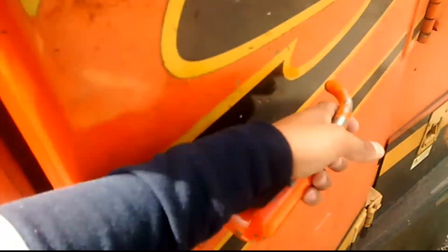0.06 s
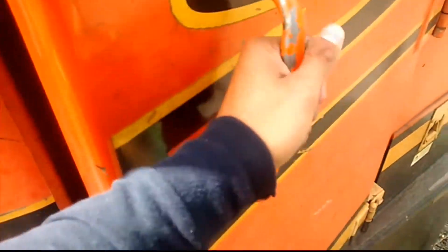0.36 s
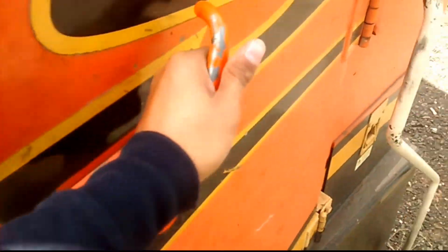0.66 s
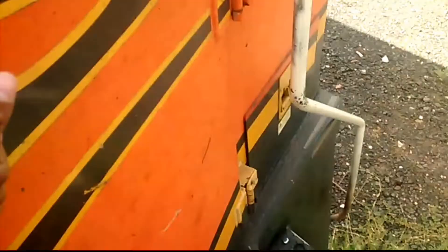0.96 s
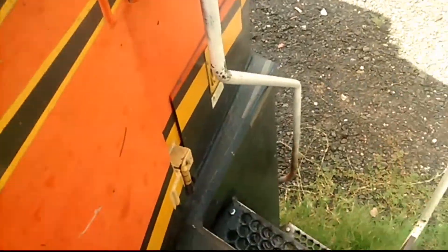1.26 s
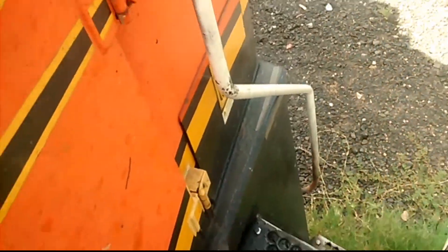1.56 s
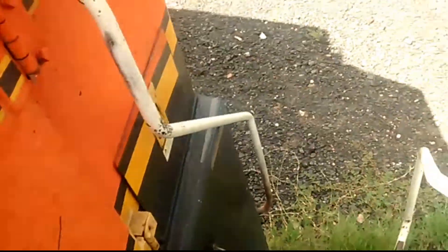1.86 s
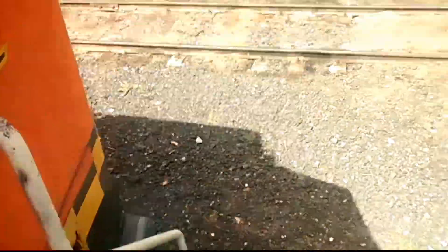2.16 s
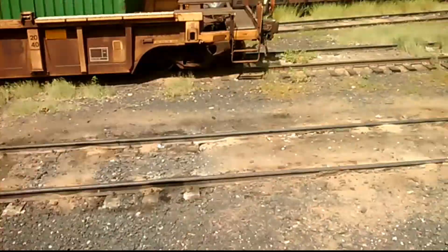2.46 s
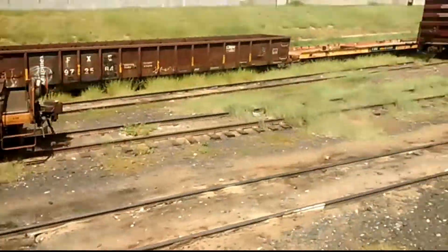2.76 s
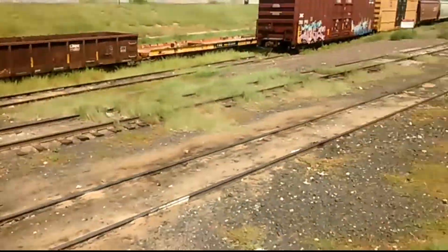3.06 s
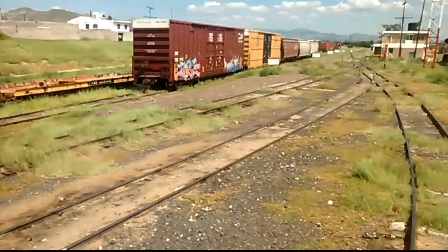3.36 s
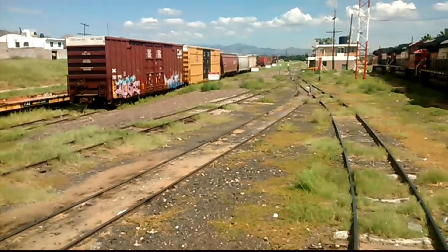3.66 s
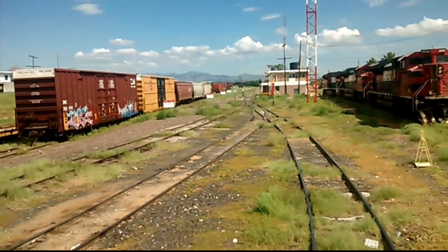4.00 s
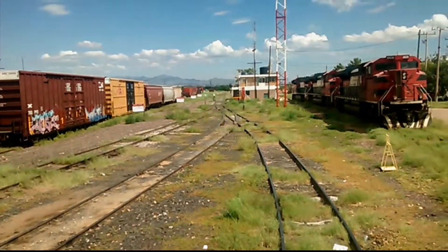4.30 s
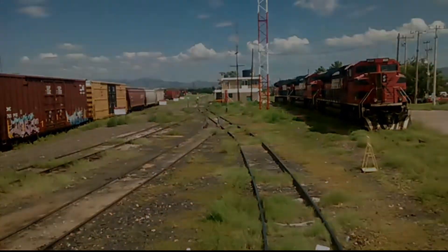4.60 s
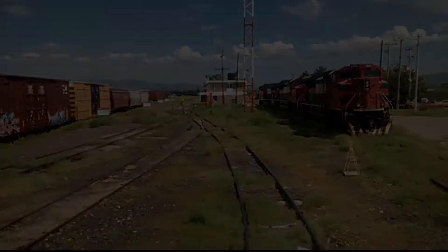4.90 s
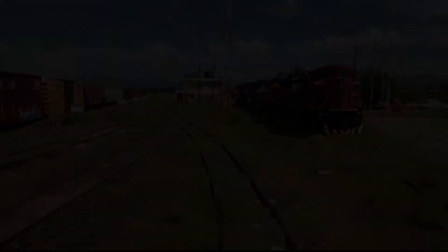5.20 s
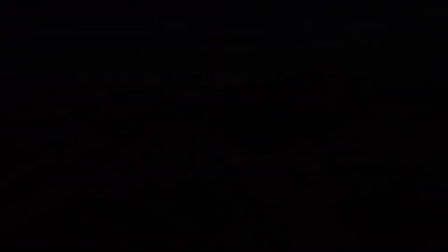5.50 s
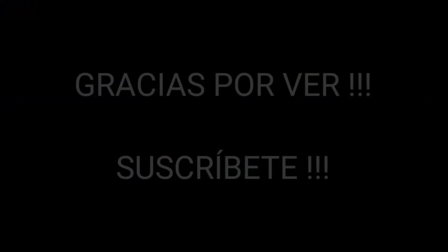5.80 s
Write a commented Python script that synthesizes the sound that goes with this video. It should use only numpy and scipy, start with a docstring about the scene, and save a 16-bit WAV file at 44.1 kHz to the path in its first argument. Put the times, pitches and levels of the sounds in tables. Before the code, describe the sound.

Close by, a hand works the steel fittings on a locomotive cab, making irregular knocks, sharp clicks and tiny squeaks over a rumbling panel. Something clacks free and scrapes briefly to a stop. After that, only low, gusty wind remains in the open rail yard, with faint rubs and soft bumps on the microphone, until it fades out.

```python
"""At a locomotive cab in an open rail yard, a hand works the steel fittings on the cab's side.
They knock and click when struck, squeak as the steel sticks and slips, and make the panel rumble;
then something clacks free and scrapes to a stop. Low, gusty wind is left, with hollow hums, light rubs,
a brushing sleeve, and buffets and soft bumps on the microphone. It fades out.
The left channel is inverted."""
import sys
import numpy as np
from scipy import signal
from scipy.fft import rfft, irfft, next_fast_len
from scipy.io import wavfile
from scipy.ndimage import uniform_filter1d

SR = 44100
rng = np.random.default_rng(int(sys.argv[2]) if len(sys.argv) > 2 else 0)


def store_pcm(level_fs):
    """Save levels as 16-bit WAV."""
    pcm = np.round(np.clip(level_fs, -1, 1) * 32767).astype(np.int16)
    wavfile.write(sys.argv[1], SR, np.atleast_2d(pcm).T)


N = 257720
TIME = np.arange(N) / SR

# A mode is a note that a part rings at; t60 is the time it takes to die away by 60 dB.
# A colour is a gain for each pitch. Levels are relative: colours and gains act on top of them.
# blows on the steel: t/s, level/dB, treble/dB, crack/dB, panel ring/dB,
# then the struck spot's f/Hz, level/dB, t60/s, then the clank's f/Hz, level/dB
KNOCKS = [(.135, 15, -7, -13, -14, 1840, -39, 0.026, 2900, -33),
          (.151, 6, -10, 15, -15, 1150, -25.5, .05, 3280, -44),
          (.321, 22, -4.5, -27, -1, 945, -23, 0.069, 3600, -26.5),
          (.410, 28, -4.5, -9.5, -1, 1196, -16.5, 0.1, 3160, -22),
          (.426, 26.5, -19, -9.5, -1.5, 631, -12, 0.1, 1300, -40),
          (.476, 22.5, -4, -3, -4, 500, -32, 0.044, 1750, -32),
          (.784, 19, -7, -7.5, -10, 985, -27, 0.079, 1530, -38),
          (.857, 28.5, -6, -5, -1, 790, -10.5, 0.052, 1940, -21),
          (.884, 26.5, 0, -12, -7.5, 1780, -15.5, 0.013, 3780, -22),
          (1.096, 25, -4.5, -4, -1.5, 1570, -22.5, 0.036, 1390, -39),
          (1.123, 27, -8.5, -1.5, -11, 710, -25, .03, 3560, -23),
          (1.257, 29, -2.5, -6.5, 1, 686, -3.5, 0.055, 1716, -16),
          (1.6286, 34.5, 3.5, 2, -10, 420, -6, .035, 1150, -11),
          (1.705, 21.5, -4, -8.5, -2, 910, -15, 0.02, 1550, -27),
          (1.796, 28.5, -1.5, -7.5, -17.5, 730, -22.5, 0.016, 1650, -29),
          (1.813, 26.5, -14, -14.5, -12, 1250, -19, 0.017, 1590, -16.5)]
# colour of a blow: f/Hz, level/dB
KNOCK_COLOUR = [(80, 1), (200, 5), (450, 1), (700, -5.5), (1200, -13), (1900, -19), (2650, -22),
                (3500, -24), (4300, -28), (5200, -28.5), (6500, -32.5), (9000, -40), (12000, -51),
                (15000, -67.5)]
# modes of a clanking fitting: multiple of its pitch, level/dB
CLANK_MODES = [(0.861, -2), (0.949, -2.5), (1.05, -3), (1.17, -7)]
# modes of the cab panel: f/Hz, level/dB, t60/s
PANEL_MODES = [(521.7, 1.5, 0.19), (648, 4.5, 0.095), (759.5, -1.5, 0.12), (853, -4.5, 0.097),
               (975, -9.5, 0.2), (1075, -11.5, 0.18), (1204, -19, 0.19), (1724, -8, 0.05),
               (1860, -17.5, 0.042), (2212, -15.5, 0.091), (2914, -17.5, 0.15), (3300, -18, 0.1),
               (3830, -20, 0.093)]
# clicks of small steel parts: t/s, level/dB, ring/dB, centre of the ring f/Hz
CLICKS = [(0.989, 4.5, -5, 13000), (1.044, -9.5, -14, 7000), (1.2115, 3, -4, 9800), (1.335, -19, -20, 6000),
          (1.656, -16.5, -16, 4000), (1.704, -7.5, -14, 8500), (1.749, -15, -12, 7400),
          (1.764, -8.5, -7, 7400), (1.813, -11, -12, 6500), (1.832, 0.5, -10, 6440),
          (1.855, -19, -12, 6700), (1.948, -11.5, -3, 4000), (2.031, -21, -3, 4300),
          (2.087, -28, -10, 3600)]
# colour of a click: f/Hz, level/dB
CLICK_COLOUR = [(300, -17), (900, -1), (1600, 3), (2400, -3), (3400, 1), (5000, -4), (7000, -4.5),
                (10000, -9.5), (13000, -31), (15500, -32)]
# modes of the small steel parts: f/Hz, level/dB, t60/s
SMALL_PART_MODES = [(3138, -3, 0.18), (3900, 1, 0.05), (4500, -5, 0.57), (6650, -2, 0.24),
                    (7600, -1.5, 0.045), (8860, -10, 0.22), (9950, -9.5, .36), (10165, 2.5, 0.26),
                    (11210, -9, 0.17), (10950, -18, 0.25), (13080, -6, 0.22)]
# pulls on the fitting: start t/s, length/s, level/dB
PULLS = [(0, 1.68, -17), (.39, 0.078, 1.5), (.61, 0.11, -5), (.76, 0.18, -4)]
# low resonances of the panel: f/Hz, rough width/Hz, level/dB
RUMBLE_MODES = [(232, 15.3, 4.5), (320, 48, -17), (420, 99, -5), (465, 130, -5), (592, 18, -12.5)]
# scrapes after the clack: start t/s, length/s, level/dB
SCRAPES = [(1.64, 0.045, 1), (1.71, 0.042, -12), (1.757, 0.065, -4.5)]
# colour of scraping steel: f/Hz, level/dB
SCRAPE_COLOUR = [(100, -11.5), (300, -16), (680, -7.5), (1100, -17.5), (1550, -14.5), (2000, -19.5),
                 (2600, -28.5), (3600, -34), (4080, -23), (4500, -33.5), (5200, -44.5), (6500, -38.5),
                 (7000, -44), (7450, -31.5), (8100, -52), (8750, -39), (10000, -50.5), (11500, -52.5),
                 (15500, -69.5)]
# squeals of steel: start t/s, length/s, first f/Hz, last f/Hz, level/dB, jitter as a share of the pitch
SQUEALS = [(0.141, 0.012, 1146, 1140, -35.5, 0.13), (.269, 0.036, 5620, 5670, -42, 0.02),
           (0.3053, 0.0052, 7480, 7330, -36.5, 0.03), (.306, 0.0058, 6870, 6450, -41, .05),
           (.308, 0.0027, 5400, 5450, -33.5, .03), (.781, 0.01, 1075, 935, -23.5, 0.03),
           (.782, 0.019, 1550, 1525, -43, 0), (1.662, 0.036, 1632, 1410, -34, 0.04),
           (1.757, 0.0089, 1660, 1580, -27.5, 0), (1.776, 0.012, 1573, 1590, -25.5, 0.08),
           (1.811, 0.01, 1530, 1460, -28.5, 0.03), (3.762, .012, 9780, 9760, -58.5, 0.05)]
# resonances of the handle: f/Hz, width/Hz, level/dB
HANDLE_MODES = [(5712, 10, 3), (7500, 32, 1), (11700, 22, -4), (13450, 25, 10)]
# hissing rubs and hollow hums in the yard noise: middle t/s, half length/s, f/Hz, width/Hz, level/dB
RUBS_AND_HUMS = [(0.155, 0.01, 3180, 1100, -28), (2.215, 0.016, 1830, 200, -38),
                 (2.266, 0.13, 449, 90, -14), (2.505, 0.13, 6660, 450, -49), (2.48, 0.13, 5930, 220, -49),
                 (3.074, 0.044, 520, 120, -7.5), (3.18, .045, 4460, 600, -39),
                 (3.204, 0.04, 1320, 160, -17.5), (3.692, 0.052, 487, 70, -8),
                 (3.822, .012, 11100, 600, -48), (5.21, 0.045, 3900, 700, -55)]
# soft bumps on the microphone: t/s, thud level/dB, thud f/Hz, scuff level/dB, scuff t60/s
BUMPS = [(2.205, -34, 450, 8, 0.085), (3.268, -5.5, 270, 9, 0.027), (3.326, -27, 700, 29.5, 0.13),
         (3.512, -15, 300, 17, 0.035), (3.545, -11, 320, 7, .03), (3.751, -22, 1080, 33, 0.094),
         (3.754, -5, 435, 24.5, 0.11), (3.957, -12.5, 1340, 29, 0.085), (4.013, -6.5, 238.8, 12, .03),
         (4.056, -11, 333, 10, .02), (4.062, -9.5, 356, 14, 0.019), (4.102, -10, 276, 22.5, 0.021),
         (4.13, -10, 333, 13, 0.022), (4.163, -10.5, 273, 20.5, 0.029), (4.182, -8, 392, 17, 0.027),
         (4.2, -13.5, 714, 22, 0.03), (4.202, -14, 340, 23, 0.015), (4.377, -12, 278, 13, .03),
         (4.782, -19, 290, 9, .03), (4.946, -19, 280, 1, .03), (5.031, -8, 435, 15.5, .025),
         (5.111, -16, 550, 12, 0.091), (5.25, -18, 302, 17, 0.1), (5.54, -12.5, 400, 23, .06),
         (5.59, -23, 402, 18.5, .05)]
# colour of a bump's scuff: f/Hz, level/dB
SCUFF_COLOUR = [(60, 2), (150, -3), (300, -6), (600, -8), (1200, -20.5), (2100, -29), (4000, -37.5),
                (5500, -53), (8000, -63), (15000, -84)]
# open air of the yard: t/s, level/dB, bass/dB, treble/dB
WIND = [(0, -6, 4.5, 3.5), (.22, -7.5, 9, 6), (.38, -4.5, 4, 4.5), (1.02, -1, -1.5, 5),
        (1.42, -9, 0.5, 4.5), (1.58, -3.5, 1, 3.5), (1.9, -12.5, -1, 5.5), (2.13, -16, 1, 6.5),
        (2.24, -10.5, -0.5, 4.5), (2.65, -4.5, -4, -0.5), (3.34, 2.5, -5, 3), (3.48, -2, 0, 1),
        (3.74, 1, -3.5, 0.5), (4.06, 1, -2.5, -2), (4.23, -7, 2.5, -3), (4.72, -3.5, -2, -6),
        (5.02, -10, 5, 4.5), (5.6, -4, -3.5, 3), (5.68, -5, -3, 7)]
# colour of the wind: f/Hz, level/dB
WIND_COLOUR = [(15, 5.5), (29, -13.5), (62, -13), (110, -0.5), (230, -1), (480, -9.5), (800, -21),
               (1350, -28.5), (2300, -41.5), (3100, -45.5), (4200, -49.5), (5500, -57), (9500, -62.5),
               (12500, -72.5), (15000, -80)]
# colour of the deep gusts: f/Hz, level/dB
GUST_COLOUR = [(10, -14), (28, 1), (45, -17), (70, -25), (200, -52), (600, -100)]
# buffets of wind on the microphone: middle t/s, half length/s, level/dB
BUFFETS = [(.17, 0.39, -6.5), (1.13, 0.065, 0), (3.29, 0.15, -5.5), (4.16, 0.059, -0.5), (4.79, 0.1, 0.5),
           (4.945, 0.027, 4), (5.26, 0.032, 4)]
# colour of a buffet: f/Hz, level/dB
BUFFET_COLOUR = [(30, -18), (62, -20.5), (110, -3.5), (200, 1), (400, -11.5), (800, -23.5), (2000, -60),
                 (6000, -89.5)]
# faint high hisses (sleeve brushes and the crisp edge of one bump): middle t/s, half length/s, level/dB
HISSES = [(.55, 0.011, -46.5), (1.525, 0.017, -52), (2.5, 0.22, -57), (3.17, 0.052, -47),
          (3.356, 0.071, -57.5), (3.966, 0.011, -48), (4.0, 0.17, -55), (4.41, .012, -56),
          (4.58, 0.3, -56.5)]
# colour of those hisses: f/Hz, level/dB
HISS_COLOUR = [(500, -34), (3000, -2.5), (6500, -2.5), (9500, -2), (12500, -8), (15000, -18)]
# how alike the noise is left and right: f/Hz, likeness from 0 to 1
STEREO_LIKENESS = [(100, 1), (1200, 1), (2300, 0.9), (4000, 0.84), (8000, 0.099), (15000, 0.23)]
# gain of the left channel: f/Hz, level/dB
LEFT_COLOUR = [(60, -2), (110, -3), (200, -3), (380, -3.5), (700, -6.5), (1290, -4.5), (2380, -5.5),
               (4400, -5.5), (8120, -4.5), (15000, -5)]


def knocks(ring_db=-46, hard_db=32.5, hard_t60=0.076, clank_cycles=50):
    """Each blow cracks, clatters, clanks and rings the steel; harder ones have a shorter clatter."""
    out = np.zeros((2, N))
    for s, db, treble_db, crack_db, panel_db, spot_hz, spot_db, spot_t60, clank_hz, clank_db in KNOCKS:
        softer_db = hard_db - db
        hit = blow(hard_t60 * amp(1.28 * softer_db), crack_db, swell=0.0052)
        bass_db = -4.5 - 0.07 * softer_db - 0.059 * panel_db  # more panel ring, slightly less bass
        add(out, s, amp(db) * coloured(hit, KNOCK_COLOUR, bass_db, treble_db))
        panel = focused(PANEL_MODES, spot_hz, octave_loss_db=1)
        add(out, s, amp(db + panel_db + ring_db) * ring(panel))
        add(out, s, ring([(spot_hz, spot_db, spot_t60)]))
        clank_t60 = clank_cycles / clank_hz
        clank = [(clank_hz * ratio, clank_db + mode_db, clank_t60) for ratio, mode_db in CLANK_MODES]
        add(out, s, ring(clank))
    return out


def clicks(ring_db=-42, gain_db=1):
    """Small steel parts click: a catch snapping, scrape ticks and lower ticks, each around its pitch."""
    out = np.zeros((2, N))
    for s, db, part_db, centre_hz in CLICKS:
        snap = blow(t60=0.04, crack_db=-4.5, swell=0.003)
        add(out, s, amp(db + gain_db) * coloured(snap, CLICK_COLOUR))
        modes = focused(SMALL_PART_MODES, centre_hz, octave_loss_db=18)
        add(out, s, amp(db + part_db + ring_db) * ring(modes))
    return out


def panel_rumble():
    """Friction from each pull shakes the low resonances of the panel."""
    friction = noise(N) * strokes(PULLS, attack_s=0.028, release_db_per_s=177.5)
    return filtered(friction, lambda f: sum(
        amp(db) / (1 + ((f - hz) / (0.82 * width)) ** 2) for hz, width, db in RUMBLE_MODES))


def scrape(slips_per_s=420, slip_db=13.5, hiss_db=-4, chatter_db=1):
    """Tiny slips of steel on steel tick over a hiss, and a slower chatter shakes their level."""
    slips = (rng.random(N) < slips_per_s / SR) * rng.uniform(-1.5, 1.5, N)
    friction = amp(slip_db) * slips + amp(hiss_db) * noise(N)
    friction *= amp(chatter_db * wander(N, rate_hz=52))
    friction *= strokes(SCRAPES, attack_s=0.0072, release_db_per_s=348)
    return coloured(friction, SCRAPE_COLOUR)


def squeals(flutter_db=3, attack_s=0.0028, release_db_per_s=1099.5):
    """Steel that sticks and slips regularly sings a note and its octave, and sets the handle ringing."""
    out = np.zeros((2, N))
    t = np.arange(SR // 8) / SR
    for s, length, first_hz, last_hz, db, jitter in SQUEALS:
        glide_hz = np.interp(t, [0, length], [first_hz, last_hz])
        pitch_hz = glide_hz * (1 + jitter * wander(len(t), rate_hz=2100))
        phase = 2 * np.pi * np.cumsum(pitch_hz) / SR
        octave_db = read([(3500, -21.5), (5700, -7.5), (6700, -14), (7500, -19)], first_hz)
        tone = np.sin(phase) + amp(octave_db) * np.sin(2 * phase)
        hold = np.minimum(t / attack_s, 1) * amp(-release_db_per_s * np.maximum(t - length, 0))
        add(out, s, np.sqrt(2) * tone * hold * amp(db + flutter_db * wander(len(t), rate_hz=160)))
    return filtered(out, lambda f: 1 + sum(
        amp(db) / (1 + 2j * (f - hz) / width) for hz, width, db in HANDLE_MODES))


def rubs_and_hums(grain_db=3):
    """Brief sounds, each in a narrow band: light hissing rubs and hollow hums in the yard noise."""
    grit = noise(N) * amp(grain_db * wander(N, rate_hz=160))
    out = np.zeros((2, N))
    for s, half, hz, width, db in RUBS_AND_HUMS:
        out += filtered(grit * swells([(s, half, db)]), lambda f: 1 / (1 + (2 * (f - hz) / width) ** 4))
    return out


def bumps(rise_cycles=0.54):
    """Each bump rocks the microphone's housing for a cycle or two and scuffs it briefly."""
    out = np.zeros((2, N))
    t = np.arange(SR // 20) / SR
    for s, db, hz, scuff_db, t60 in BUMPS:
        age = t * hz / rise_cycles  # the push is strongest at age 1
        push = (age * np.exp(1 - age)) ** 2
        add(out, s, amp(db) * push * np.sin(2 * np.pi * hz * t))
        scuff = blow(t60, crack_db=-11, swell=0.0039)
        add(out, s, amp(scuff_db) * coloured(scuff, SCUFF_COLOUR, treble_db=-3))
    return out


def wind(patch_db=2.2, buffet_db=1):
    """Moving air makes a low rush; patches of pitch swell and sink, and the bass shakes quickly."""
    hz, t, spectrum = signal.stft(noise(N), SR, nperseg=1024, noverlap=768)
    db, bass_db, treble_db = wind_levels(t)
    patches = uniform_filter1d(rng.standard_normal(spectrum.shape[1:]), size=9, axis=0)  # blur in pitch
    patches = uniform_filter1d(patches, size=10, axis=1)  # blur in time
    spectrum *= amp(db + tilt(hz[:, None], bass_db, treble_db) + patch_db * patches / patches.std())
    air = signal.istft(spectrum, SR, nperseg=1024, noverlap=768)[1][:, :N]
    bass = filtered(air, lambda f: 1 / (1 + (f / 1100) ** 4))
    air += bass * (amp(buffet_db * wander(N, rate_hz=51)) - 1)
    return filtered(air, lambda f: amp(read(WIND_COLOUR, f)))


def gusts(gain_db=4):
    """Slowly churning air presses on the microphone, most when the wind is loud and bright."""
    db, _, treble_db = wind_levels(TIME)
    pressure = noise(N) * amp(gain_db + 0.99 * db + 0.65 * treble_db)
    return filtered(pressure, lambda hz: amp(read(GUST_COLOUR, hz)))


def buffets(flutter_db=3):
    """Brief swirls of air flutter against the microphone."""
    swirls = noise(N) * swells(BUFFETS) * amp(flutter_db * wander(N, rate_hz=150))
    return filtered(swirls, lambda hz: amp(read(BUFFET_COLOUR, hz)))


def faint_hisses(grain_db=1.7):
    """High, grainy hisses swell and ebb: a sleeve's fibres catching, and the crisp edge of one bump."""
    hiss = noise(N) * swells(HISSES) * amp(grain_db * wander(N, rate_hz=160))
    return coloured(hiss, HISS_COLOUR)


def blow(t60, crack_db, swell, size=16384):
    """A crack and its noisy tail. A stronger crack makes the tail rise and lose its treble sooner."""
    t, tail, crack = np.arange(size) / SR, noise(size), amp(crack_db)
    low = filtered(tail, lambda hz: 1 / (1 + (hz / 1800) ** 4))
    rise = 1 - np.exp(-t * (1 + 10 * crack) / swell)
    slow = rise * 1000 ** (-t / t60)
    fast = rise * 1000 ** (-t * (1 + crack) / t60)
    out = (low * slow + (tail - low) * fast) / np.linalg.norm(slow)
    out[:, 0] += crack
    return out / np.sqrt(1 + crack ** 2)


def ring(modes, contact_s=0.00065):
    """Struck steel rings as dying sine waves that start up or down and build during the contact."""
    t = np.arange(SR // 2) / SR
    sines = sum(rng.choice([-1, 1]) * amp(db - 60 * t / t60) * np.sin(2 * np.pi * hz * t)
                for hz, db, t60 in modes)
    return sines * (1 - np.exp(-t / contact_s))


def focused(modes, centre_hz, octave_loss_db):
    """Weakens modes the further they lie from centre_hz."""
    return [(hz, db - octave_loss_db * np.log2(hz / centre_hz) ** 2, t60) for hz, db, t60 in modes]


def strokes(rows, attack_s, release_db_per_s):
    """Gain over time of rubbing strokes: each rises, holds and dies away."""
    return sum(np.clip((TIME - s) / attack_s, 0, 1)
               * amp(db - release_db_per_s * np.maximum(TIME - s - length, 0)) for s, length, db in rows)


def swells(rows):
    """Gain over time of smooth swells that come and go."""
    return sum(amp(db) * np.exp(-((TIME - s) / half) ** 2) for s, half, db in rows)


def wind_levels(t):
    """Level, bass and treble of the open air at the times t, in dB."""
    s, *columns = np.transpose(WIND)
    return [np.interp(t, s, column) for column in columns]


def noise(size):
    """White noise in two channels, less alike toward the treble."""
    right, other = rng.standard_normal((2, size))
    alike = lambda hz: read(STEREO_LIKENESS, hz)
    left = filtered(right, alike) + filtered(other, lambda hz: np.sqrt(1 - alike(hz) ** 2))
    return np.array([left, right])


def wander(size, rate_hz):
    """A random wobble of typical size 1, moving up to about rate_hz times a second."""
    wobble = filtered(rng.standard_normal(N), lambda hz: np.exp(-(hz / rate_hz) ** 2))
    return (wobble / wobble.std())[:size]


def coloured(x, colour, bass_db=0, treble_db=0, size=4096):
    """Applies a colour with no sound leaking ahead of a hit, so attacks stay sharp."""
    hz = abs(np.fft.fftfreq(size, 1 / SR))
    gain = amp(read(colour, hz) + tilt(hz, bass_db, treble_db)) * (hz + 1) / (hz + 25)
    response = np.exp(np.conj(signal.hilbert(np.log(gain))))  # minimum phase: as early as possible
    taps = np.fft.ifft(response).real
    return signal.fftconvolve(x, taps[None, :size // 2], axes=1)[:, :x.shape[1]]


def tilt(hz, bass_db, treble_db):
    """Bass and treble controls: the change in dB at each frequency."""
    bass_weight = read([(400, 0.89), (1000, 0)], hz)
    treble_weight = read([(1700, 0.011), (4000, 0.91), (12000, 2.0)], hz)
    return bass_db * bass_weight + treble_db * treble_weight


def filtered(x, gain):
    """Filters by a gain given as a function of frequency."""
    size = next_fast_len(x.shape[-1] + SR // 8)
    hz = np.fft.rfftfreq(size, 1 / SR)
    return irfft(rfft(x, size) * gain(hz), size)[..., :x.shape[-1]]


def read(points, hz):
    """The value at hz on straight lines joining the points over log frequency."""
    f, value = np.transpose(points)
    return np.interp(np.log(hz + 1), np.log(f + 1), value)


def add(mix, s, sound):
    """Mixes a sound in at s seconds."""
    part = mix[:, max(round(s * SR), 0):][:, :sound.shape[-1]]
    part += sound[..., :part.shape[1]]


def amp(db):
    """Decibels to gain."""
    return 10 ** (np.asarray(db) / 20)


def scene(fade_start_s=4.64, fade_db_per_s=21.5, silent_s=5.73):
    """The fittings close by, with rubs and hums, over a background that fades evenly and then stops."""
    fittings = knocks() + clicks() + panel_rumble() + scrape() + squeals()
    brief_sounds = rubs_and_hums()
    background = wind() + gusts() + buffets() + bumps() + faint_hisses()
    fade = amp(-fade_db_per_s * np.maximum(TIME - fade_start_s, 0))
    stop = np.clip((silent_s - TIME) / 0.0033, 0, 1)
    return fittings + brief_sounds + background * fade * stop


def record(dry, lag_s=0.0003835, top_hz=15500):
    """Makes the left channel upside down, weaker and late; rounds off peaks and cuts the top treble."""
    left = filtered(dry[0], lambda hz: -amp(read(LEFT_COLOUR, hz)) * np.exp(-2j * np.pi * hz * lag_s))
    pair = np.array([left, dry[1]])
    rounded = pair / (1 + pair ** 6) ** (1 / 6)
    lowpass = signal.firwin(601, top_hz, window=("kaiser", 9), fs=SR)
    return signal.oaconvolve(rounded, lowpass[None], "same", axes=1)


dry = scene()
out = record(dry)
store_pcm(out)
```